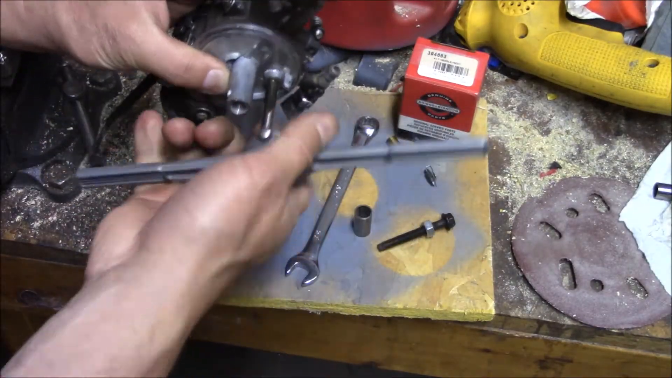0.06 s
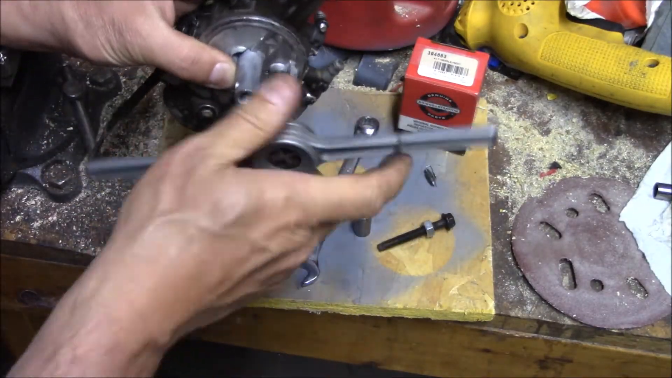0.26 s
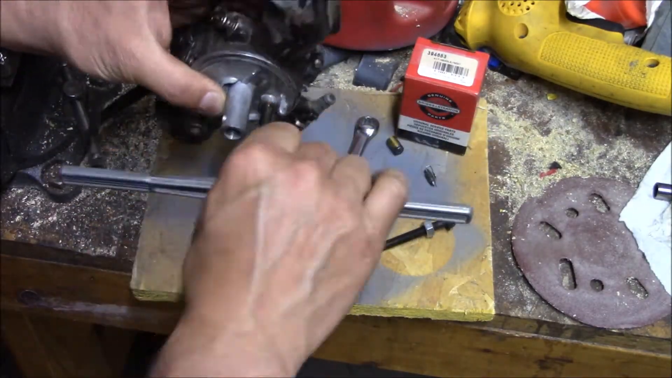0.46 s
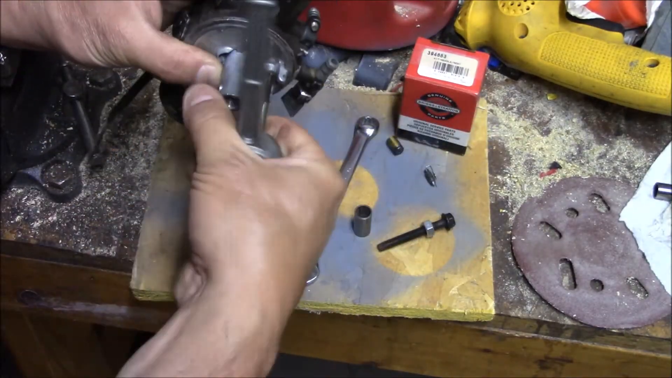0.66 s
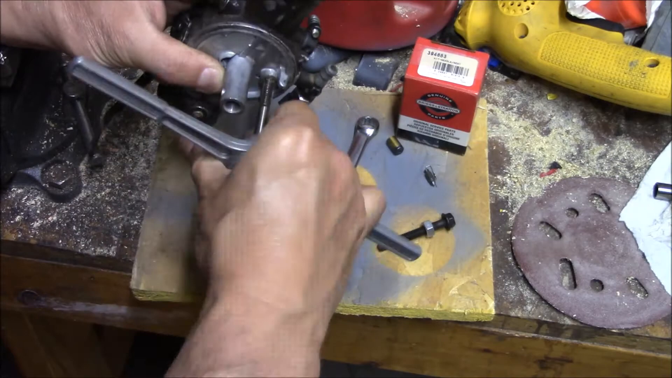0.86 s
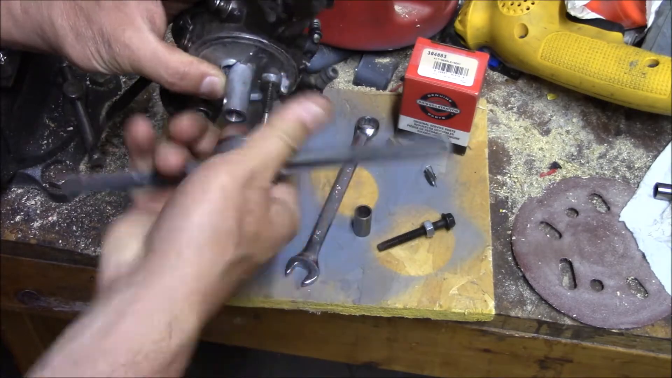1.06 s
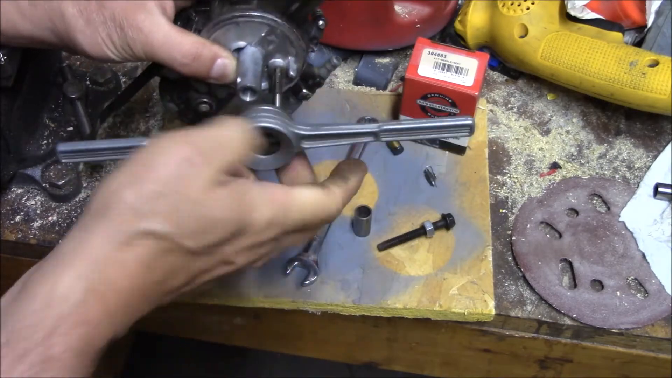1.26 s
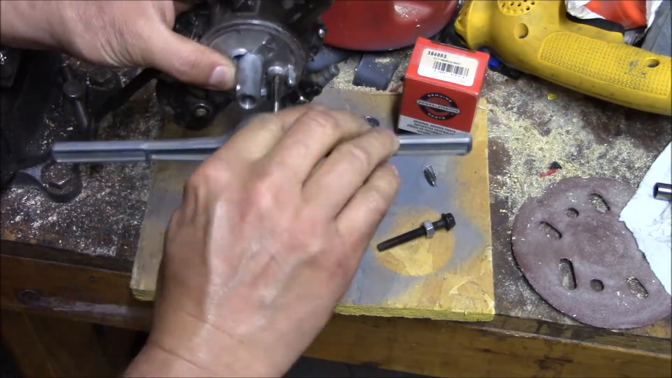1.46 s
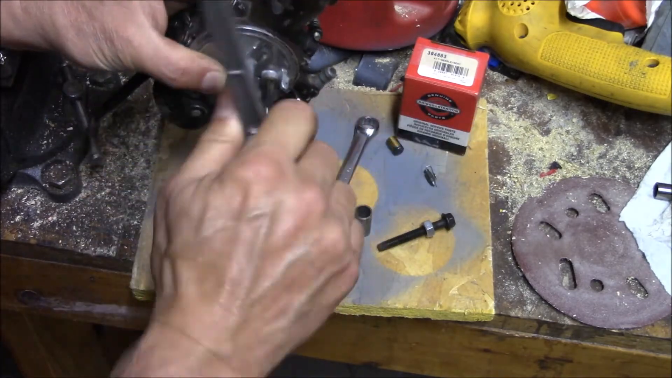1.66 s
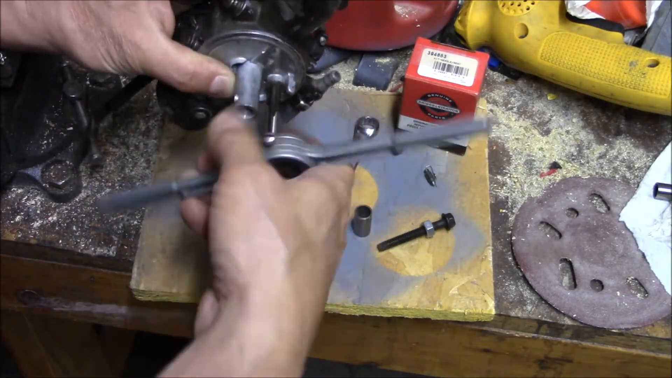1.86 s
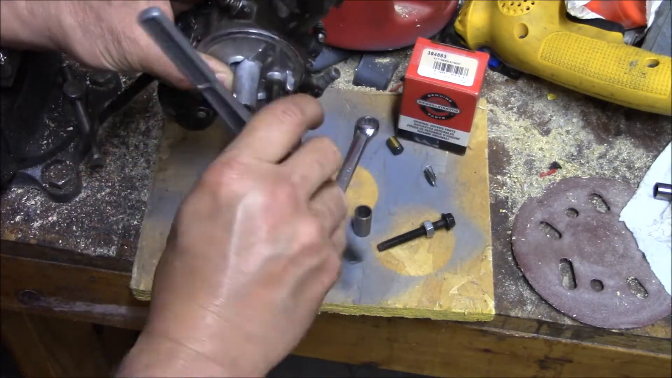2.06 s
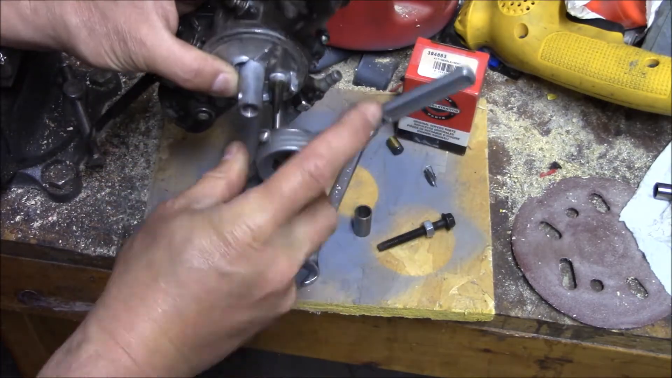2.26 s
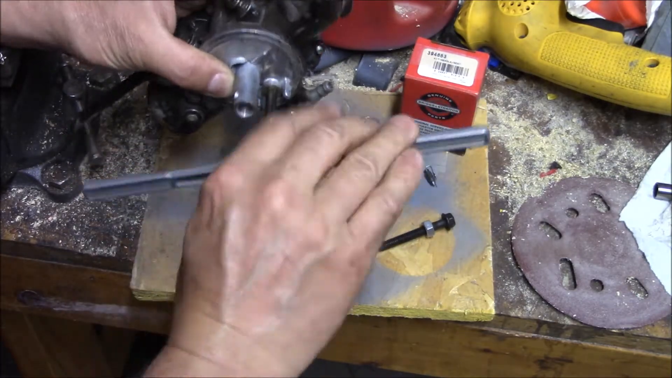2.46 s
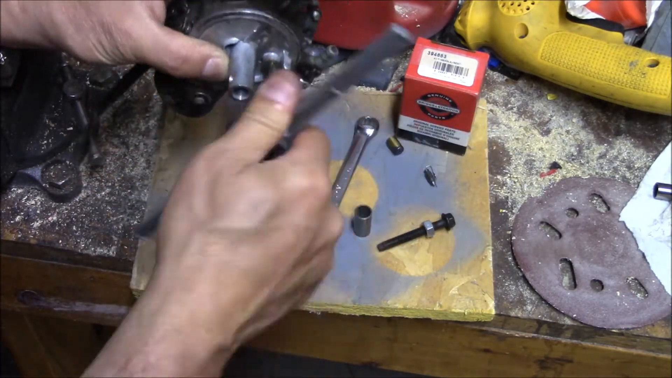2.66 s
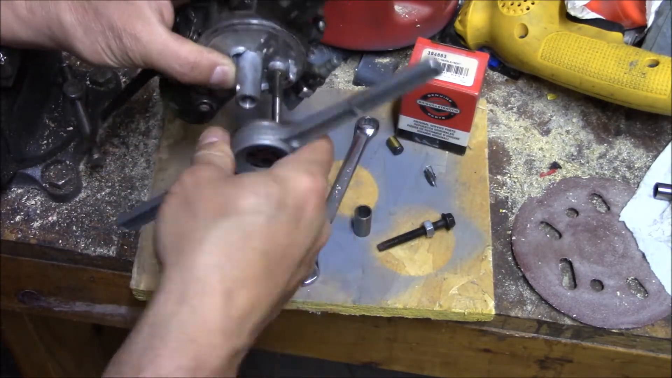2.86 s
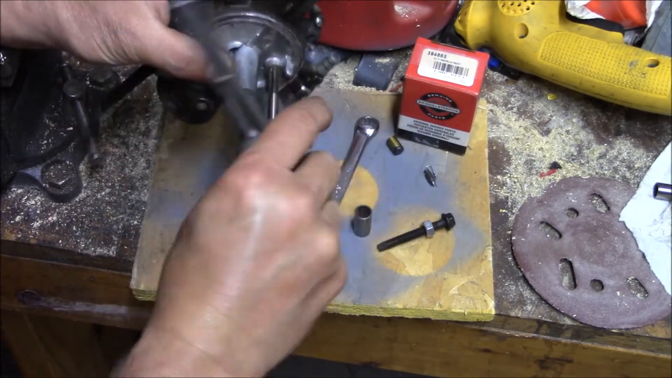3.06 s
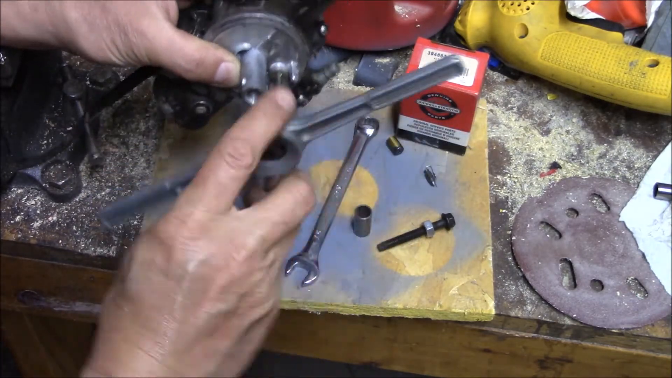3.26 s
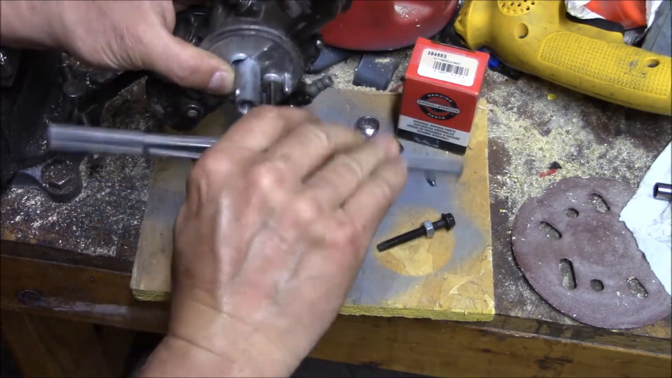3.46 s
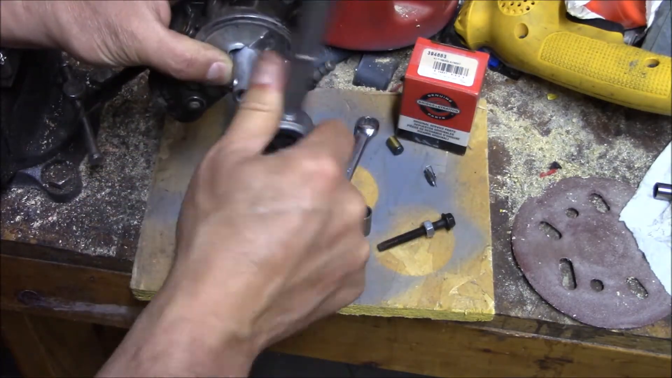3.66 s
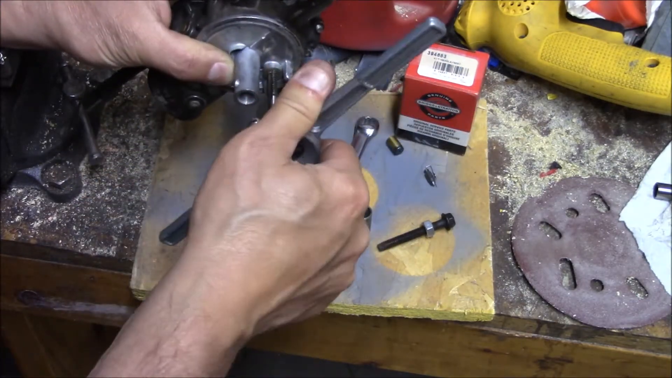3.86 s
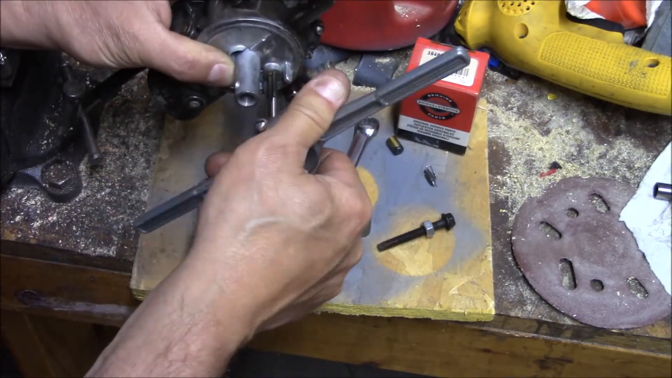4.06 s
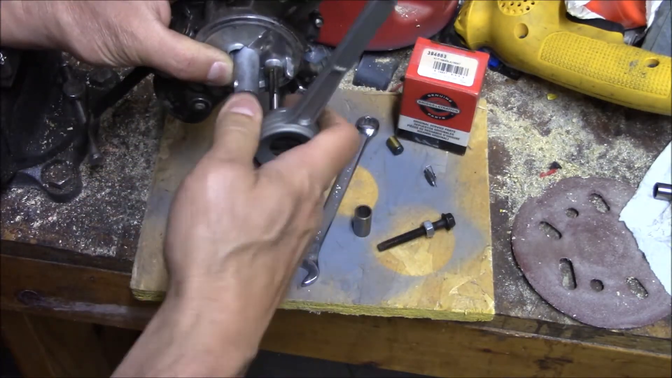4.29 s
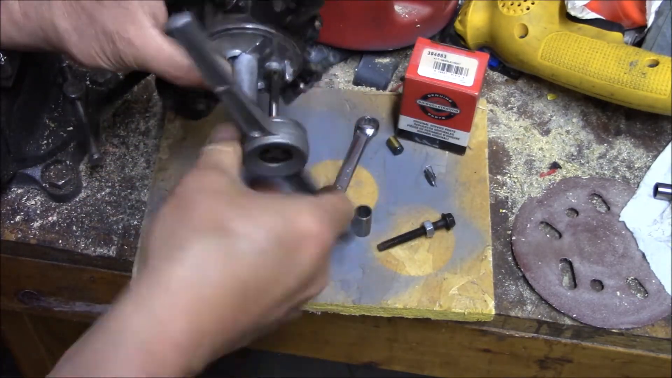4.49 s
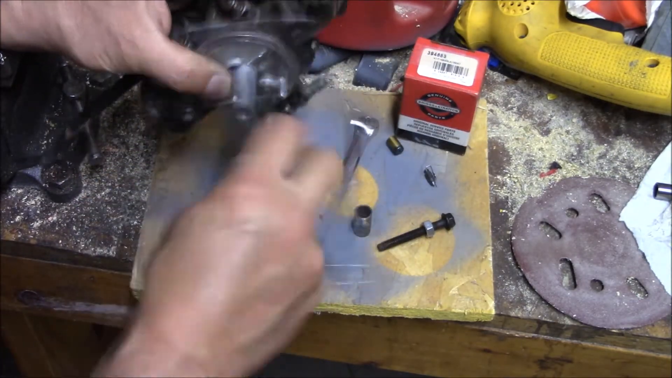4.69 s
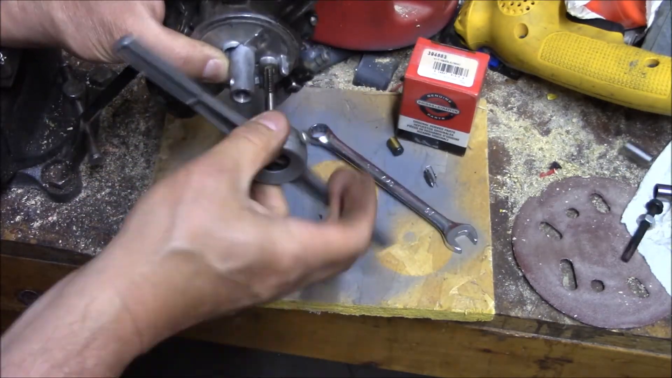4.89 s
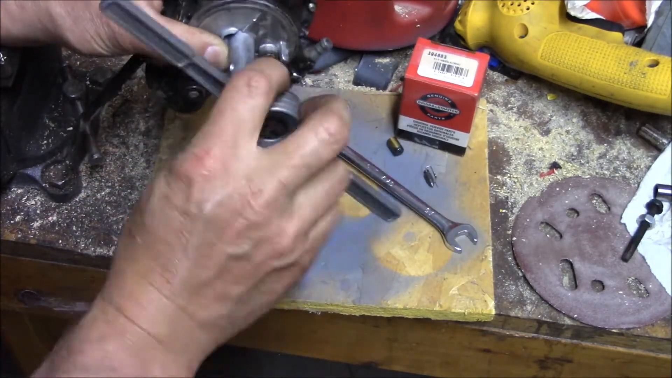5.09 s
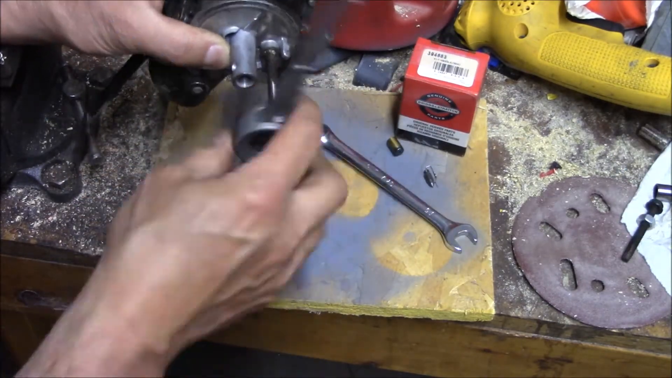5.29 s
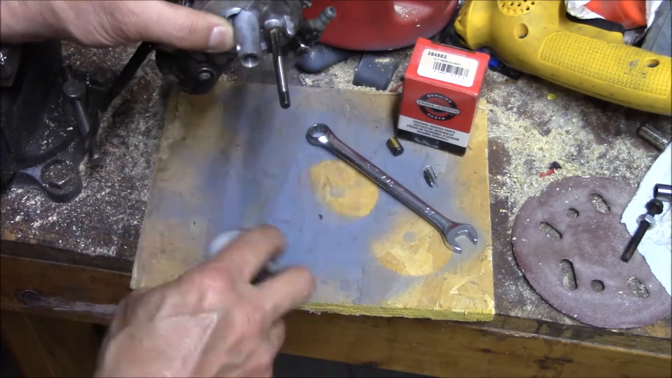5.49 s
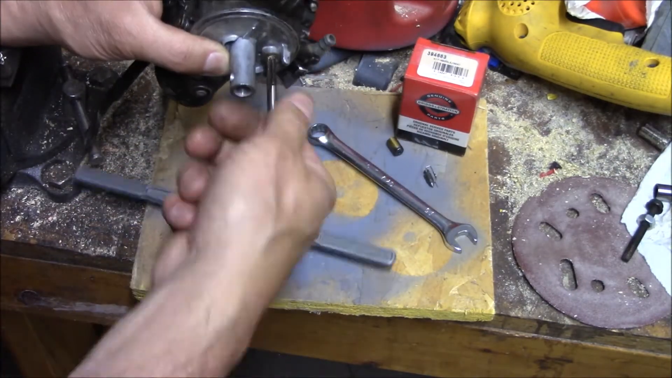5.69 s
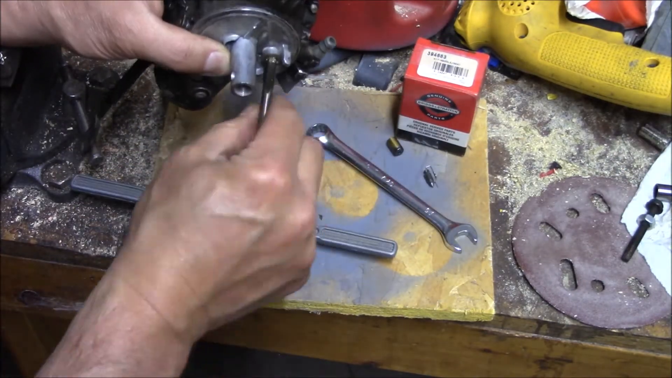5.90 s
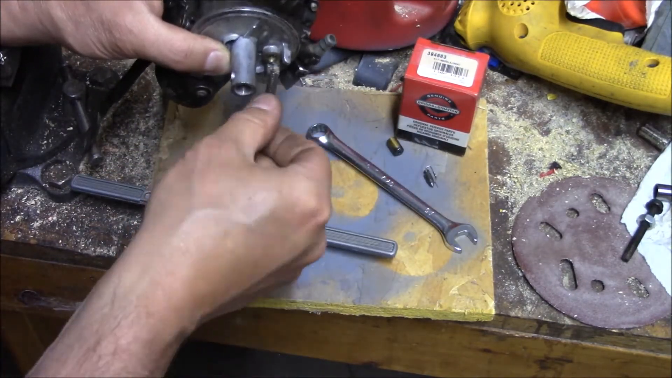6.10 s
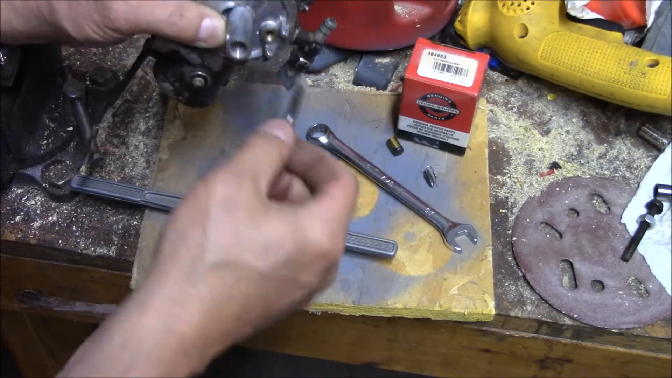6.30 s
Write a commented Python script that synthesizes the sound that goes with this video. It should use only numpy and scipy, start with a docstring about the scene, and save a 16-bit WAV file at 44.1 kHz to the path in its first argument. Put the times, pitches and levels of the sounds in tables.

```python
"""Soft bumps on the bench, then the wrench handle clicks in its play and skin rubs over it, as soft noise strokes.
Five pushes turn a tap in a small metal casting: random slips rasp through resonances, with sharp ticks.
Late on, an arm of the wrench hits a spanner on the board: noise cracks, a bouncing rattle, decaying modes.
The wrench is laid down with a clack and a thud, then soft bumps sound on the bench again.
A short workshop tail, a steady filtered hiss and faint wavering tones lie under it all."""
import sys
import numpy as np
from scipy import signal
from scipy.fft import rfft, irfft, next_fast_len
from scipy.io import wavfile

SR = 44100
rng = np.random.default_rng(int(sys.argv[2]) if len(sys.argv) > 2 else 0)


def materialize(psi):
    """Save the field psi as 16-bit PCM at rate SR to the path in sys.argv[1].

    A 1-D psi becomes a single channel; in a 2-D psi each row is a channel.
    """
    bounded = np.clip(np.atleast_2d(psi).T, -1, 1)
    quanta = np.round(bounded * 32767).astype(np.int16)
    wavfile.write(sys.argv[1], SR, quanta)


N = 279594  # length in samples

# All event levels are nominal: each source trims them before its filters.
# pushes that turn the tap: start_s, length_s, first_rasp_db, last_rasp_db, tick_over_rasp_db
PUSHES = [(0.54, 0.125, -56, -57, 5), (0.963, 0.096, -56, -57, 6), (1.473, 0.28, -56, -50.5, 8),
          (2.485, 0.2, -51, -52.5, 4), (3.555, 0.19, -56.5, -56, 13.5)]
# loud single ticks, in and between pushes: start_s, level_db
LOUD_TICKS = [(0.5634, -36), (0.598, -39), (0.626, -37), (0.6402, -40), (1.1925, -38), (1.198, -35),
              (1.6714, -30.5), (1.7296, -28), (2.0606, -35), (2.4867, -41), (2.6225, -35), (3.4829, -32.5),
              (3.5574, -34.5), (3.6381, -29.5), (3.677, -30), (3.7352, -39.5), (3.75, -36), (3.891, -34.5),
              (3.9016, -33.5), (4.437, -37), (4.684, -30), (5.3426, -33.5)]
# handle shifting on the tap's square: start_s, level_db, low_ring_db (relative to level)
HANDLE_CLICKS = [(0.2205, -37, -12), (0.3056, -45, -6.5), (0.367, -29, -13), (0.552, -44, -12),
                 (1.2048, -32.5, -17), (1.2952, -37.5, -11), (1.347, -44.5, -6), (2.0478, -42, -8.5),
                 (2.2096, -37, -23), (2.329, -34.5, -16), (2.831, -36, -16), (3.028, -36, -9),
                 (3.2957, -38, -15), (4.1308, -39, -17), (4.483, -33, -25), (4.509, -40, -12.5),
                 (4.5867, -36, -19), (4.857, -35.5, -3), (4.9375, -40, -12.5)]
# main blows of steel on steel: start_s, level_db, ring_db (relative to level)
BLOWS = [(4.6952, -3.5, -22), (4.7160, -12.5, -7.5), (4.7228, -11, -13), (4.7812, -35, -26),
         (4.7948, -36.5, -22)]
# wrench meeting the board: start_s, steel_level_db, board_level_db
LANDINGS = [(5.566, -18, -32), (5.5748, -24, -25), (5.5780, -44, -28.5), (5.596, -52, -39.5),
            (5.6530, -55, -48)]
# soft bumps of hand, wrench and casting: start_s, level_db, edge_db (relative to level), settling_s
SOFT_BUMPS = [(0.118, -35.5, -6, 0.013), (0.124, -34.5, -15, 0.033), (4.857, -50, -6, 0.032),
              (4.873, -40, -2, 0.02), (5.657, -49, 0.5, 0.018), (5.814, -45, -16, 0.02),
              (5.898, -39.5, -17, 0.13), (6.137, -37.5, -16, 0.023), (6.158, -31.5, -14, 0.017),
              (6.185, -33.5, -29, 0.025), (6.304, -32.5, -13, 0.07), (6.33, -34, -10, 0.03)]
# strokes of skin on the handle: middle_s, level_db, centre_hz
RUBS = [(0.29, -61.5, 1000), (0.547, -60, 880), (0.721, -63, 890), (1.331, -59.5, 1190), (1.628, -63, 1270),
        (1.96, -59.5, 1020), (2.244, -55, 1520), (2.619, -58, 1110), (2.825, -58.5, 1415), (3.21, -60, 980),
        (3.447, -64.5, 1613), (4.135, -65.5, 1233), (4.47, -62, 940), (5.691, -60, 1261)]

# resonances of the shank, the tap's lowest ringing, when rubbed: centre_hz, width_hz, level_db
SHANK_RESONANCES = [(5700, 260, -3.5), (6380, 110, 4.5), (7170, 280, -1)]
# resonances of the tap in its hole: centre_hz, width_hz, level_db
TAP_RESONANCES = [(5400, 200, -8), (6200, 55, 4), (7650, 410, -1), (10180, 600, 0), (11650, 200, 1),
                  (13250, 460, 4), (13750, 900, 7), (15700, 390, 3)]
# low ring of the handle: centre_hz, width_hz, level_db
HANDLE_RESONANCES = [(1380, 1700, -10), (2935, 450, 1), (4010, 390, -1)]
# bright snap of the handle on the square: centre_hz, width_hz, level_db
SOCKET_RESONANCES = [(6300, 2200, -5), (8630, 470, -2.5), (11740, 2700, -1), (11920, 1100, 3),
                     (14900, 1150, 0.5)]
# bench top and casting under a soft bump: centre_hz, width_hz, level_db
BENCH_RESONANCES = [(484, 164, -11), (740, 53, 1.5), (875, 72, 3.5), (1190, 230, -0.5), (1720, 360, -4),
                    (2180, 580, -8), (3300, 580, -20.5)]

# ringing modes of the spanner: pitch_hz, level_db, t60_s
SPANNER_MODES = [(1911, -1, .095), (2280, -7, .075), (3588, -5, .085), (4346, -10, .07), (4980, -5, .075),
                 (5089, -4, .075), (5904, -6, .07), (7925, 0, .06), (8215, -10, .07), (11097, -3, .07),
                 (11159, -3, .07), (12244, -9, .07), (12383, -8, .07), (14751, -9, .075)]
# ringing modes of the wrench bar: pitch_hz, level_db, t60_s
BAR_MODES = [(1701, -3, 0.096), (1980, -3, 0.11), (2140, -16, .15), (2286, 12.5, 0.024), (5330, -16, 0.14)]
# ringing modes of the board: pitch_hz, level_db, t60_s
BOARD_MODES = [(514, -8, 0.4), (557, -0.5, 0.29), (868, -6, 0.28), (978, -5, 0.38), (1148, 3, 0.18)]

# relative spectrum of the thread grit: frequency_hz, density_db
RASP_COLOUR = [(2940, -37), (5000, -14), (5350, 4), (5790, -26), (6160, 0.5), (6500, -3), (6660, -15),
               (7670, 2), (8970, -6), (11300, 4), (12300, -5), (15100, -18), (16000, -14.5)]
# relative spectrum of the steel blows: frequency_hz, density_db
CRACK_COLOUR = [(30, -28), (150, -38), (300, -28), (600, -15), (800, -20.5), (1400, -7), (2300, -3),
                (3150, -10.5), (4200, 1), (5000, 1.5), (5500, -7), (7600, -6), (9200, -10), (11000, -4),
                (13300, -11), (15500, -6)]
# relative spectrum of the wrench head's clack: frequency_hz, density_db
HEAD_COLOUR = [(100, -49), (1200, -13), (2300, -13), (3000, -1.5), (3800, -12), (4300, -7), (4780, 3.5),
               (5350, -3), (6300, -13.5), (7100, -18), (9200, -24), (11000, -17), (13000, -33),
               (15000, -24)]
# relative spectrum of the board's thud: frequency_hz, density_db
THUD_COLOUR = [(88, -65), (150, -34), (534, -5), (637, -4), (905, -3.5), (1450, -2.5), (1940, -5),
               (2450, -9), (9440, -17), (11300, -11), (16000, -40)]
# relative spectrum of the hard edge of a bump: frequency_hz, density_db
EDGE_COLOUR = [(1500, -16), (3500, 2), (6000, -5), (10000, -10.5), (16000, -29)]
# gain curve over the skin strokes: frequency_hz, gain_db
SKIN_COLOUR = [(150, -14), (400, -10), (800, 2), (1800, -1), (2600, -3), (12000, 9)]
# relative spectrum of the workshop hiss: frequency_hz, density_db
AIR_COLOUR = [(15, -70), (25, -23.5), (180, -20), (344, -13.5), (463, -8), (887, -3), (962, -2), (1290, -3),
              (1650, -3), (1790, -5), (4030, -8.5), (4740, -13), (5430, -9.5), (14800, -18.5), (16000, -19)]

# faint background tones: pitch_hz, level_db
HUM_TONES = [(234, -89), (959, -72.5), (1178, -73), (1416, -72), (1650, -70.5)]
# left-right likeness of the hiss: frequency_hz, correlation (plain number)
HISS_LIKENESS = [(60, 0.13), (150, 0.011), (380, 0.584), (950, 0.7), (2380, 0.49), (5980, 0.52),
                 (15000, 0.88)]
# decay of the workshop tail: frequency_hz, t60_s
ROOM_DECAY = [(200, 0.16), (700, 0.49), (2000, 0.14), (6000, 0.094), (15000, 0.1)]
# side share of the bench reflection: frequency_hz, gain_db
BENCH_SIDE = [(500, -30), (3000, -36), (8000, -20.5), (14000, -19)]

PUSH_ATTACK_S, PUSH_RELEASE_DB_PER_S = 0.0072, 300
DIP_S, DIP_DB = 0.0097, -7  # the push strength dips just before a loud tick
RUN_TICKS_PER_S, TICK_JITTER, TICK_SPREAD_DB = 92, 0.3, 3.5  # jitter in tick intervals
LOOSE_TICKS_PER_S, LOOSE_TICK_DB = 3.6, -43.5  # faint ticks, anywhere in time
CLICK_REBOUND_S, CLICK_REBOUND_DB = 0.011, -11.5  # the handle falls back once
LEAD_IN_S, LEAD_IN_DB = 0.0022, -29.5  # a faint noise burst just before the first blow
RATTLE_GAP_S, RATTLE_JITTER_S = 0.0075, 0.001026  # spacing of the spanner's bounces
RATTLE_DB, RATTLE_RING_DB, RATTLE_HOLD_S, RATTLE_FADE_DB_PER_S = -20, -6.5, 0.035, 420
RATTLE_MUTE_DB_PER_S = 250  # the board damps the ring as the spanner lies down
KNOCK_GAP_S, KNOCK_SETTLED_DB = 0.007, -23.5  # gap between contacts; loss over the settling time
RUB_HALF_S, RUB_WIDTH_HZ = 0.065, 550  # time to 1/e either side of a stroke; width of the hand's resonance
HISS_DB = -58.5
TOP_HZ = 15950  # half amplitude here


def threads():
    """Tiny slips rasp in the hole: light pressure sings in the shank, hard pressure adds bright grit."""
    slips_per_s, spread_db, slip_t60 = 480, 4, .004
    slip_sizes = amp(spread_db * np.minimum(rng.standard_normal(N), 1.5))
    slips = (rng.random(N) < slips_per_s / SR) * slip_sizes
    pressure = signal.lfilter([1], [1, -amp(-60 / (slip_t60 * SR))], slips)

    def grit():
        return unit(pressure * rng.standard_normal(N))

    push = effort(np.arange(N) / SR)
    firm = amp(-56.0)  # reference strength of a firm push
    # the singing grows more slowly than the push
    singing = resonated(grit() * firm * (push / firm) ** 0.67, SHANK_RESONANCES)
    rasp = coloured(grit() * push, RASP_COLOUR)
    tap_ring = resonated(grit() * push, TAP_RESONANCES)
    return amp(-8.5) * singing + amp(-8.5) * rasp + amp(-11.5) * tap_ring


def effort(t):
    """Push strength at times t: it takes hold quickly, stiffens or eases evenly, lets go, and dips before loud ticks."""
    total = np.zeros(len(t))
    for s, length, first_db, last_db, _ in PUSHES:
        held_db = np.interp(t, [s, s + length], [first_db, last_db])
        release_db = PUSH_RELEASE_DB_PER_S * np.maximum(t - s - length, 0)
        attack = np.clip((t - s) / PUSH_ATTACK_S, 0, 1)
        total += attack * amp(held_db - release_db)
    dipped = np.any([(t > s - DIP_S) & (t < s) for s, _ in LOUD_TICKS], axis=0)
    return total * amp(DIP_DB * dipped)


def ticks():
    """Sharp ticks, in uneven runs during pushes and singly between them: an impulse and chatter ring the tap."""
    track, chatter_trim_db, faintest_db = np.zeros(N), -6, -52
    late, strength = rng.standard_normal((int(RUN_TICKS_PER_S * N / SR), 2)).T
    times = np.abs(np.arange(len(late)) + TICK_JITTER * late) / RUN_TICKS_PER_S
    starts, *_, tick_db = np.transpose(PUSHES)
    push_db = 20 * np.log10(effort(times) + 1e-9)
    over_db = tick_db[np.searchsorted(starts, times) - 1]
    levels_db = push_db + over_db + TICK_SPREAD_DB * strength
    run = [(s, db) for s, db in zip(times, levels_db) if db > faintest_db]
    draws = rng.random((int(LOOSE_TICKS_PER_S * N / SR), 2))
    loose = [(u * N / SR, LOOSE_TICK_DB + TICK_SPREAD_DB * (2 * v - 1)) for u, v in draws]
    for s, db in LOUD_TICKS + run + loose:
        snap = contact(db + chatter_trim_db, t60=.006, chatter_db=-9, chatter_t60=.035)
        snap[0] += amp(db + 6.5)  # the sharp impulse
        add(track, s, resonated(snap, TAP_RESONANCES, scatter_db=3.5))
    return track


def handle():
    """The loose handle snaps against the tap's square and falls back, its resonances varied at each contact."""
    track = np.zeros(N)
    rebounds = [(s + CLICK_REBOUND_S, db + CLICK_REBOUND_DB, low_db) for s, db, low_db in HANDLE_CLICKS]
    for s, db, low_db in HANDLE_CLICKS + rebounds:
        snap = contact(db - 6.5, t60=0.0054, chatter_db=-5, chatter_t60=0.068)
        snap[0] += amp(db + 4)  # the sharp impulse
        add(track, s, resonated(snap, SOCKET_RESONANCES, scatter_db=4.0))
        low = contact(db + low_db + 1, t60=0.0094, chatter_db=-5.5, chatter_t60=0.077)
        add(track, s, resonated(low, HANDLE_RESONANCES, scatter_db=2.0))
    return track


def clash():
    """An arm of the handle strikes the spanner, which rattles and rings; the board rings once at the start."""
    s, levels_db, ring_db = np.transpose(BLOWS + rattle(count=14))
    blows = [contact(db - 5.5, t60=0.019, chatter_db=-9.5, chatter_t60=0.076) for db in levels_db]
    crack = contacts(s, blows)
    # the last, lightest bounces are the brightest: the colour crosses over to the socket's snap
    settle_s, fade_s = 4.738, .02
    light = np.clip((np.arange(N) / SR - settle_s) / fade_s, 0, 1)
    steel = coloured(crack * (1 - light), CRACK_COLOUR) + resonated(crack * light, SOCKET_RESONANCES)
    ringing = rings(s, levels_db + ring_db - 8, SPANNER_MODES, scatter_db=1.5)
    board_db = -45
    # the first blow also shakes the board
    return steel + ringing + rings(s[:1], [board_db], BOARD_MODES, scatter_db=3.5)


def rattle(count):
    """A faint lead-in, then spanner bounces, even while the arm drives it, then fading: start_s, level_db, ring_db."""
    first_s = BLOWS[0][0]
    after = RATTLE_GAP_S * np.arange(1, count + 1) + RATTLE_JITTER_S * rng.standard_normal(count)
    free = np.maximum(after - RATTLE_HOLD_S, 0)  # seconds since the arm stopped driving
    levels_db = RATTLE_DB - RATTLE_FADE_DB_PER_S * free
    ring_db = RATTLE_RING_DB - RATTLE_MUTE_DB_PER_S * free
    lead_in = (first_s - LEAD_IN_S, LEAD_IN_DB, RATTLE_RING_DB)
    return [lead_in] + list(zip(first_s + after, levels_db, ring_db))


def landings():
    """The wrench head clacks down, its bar rings briefly and the board under it thuds and rings."""
    s, steel_db, board_db = np.transpose(LANDINGS)
    steel = [contact(db - 5, t60=0.014, chatter_db=-6.5, chatter_t60=0.046) for db in steel_db]
    board = [contact(db - 8.0, t60=0.023, chatter_db=-7.5, chatter_t60=0.1) for db in board_db]
    clack = coloured(contacts(s, steel), HEAD_COLOUR)
    thud = coloured(contacts(s, board), THUD_COLOUR)
    # both rings follow the strength of the board's thud
    bar_ring = rings(s, board_db - 13.5, BAR_MODES, scatter_db=1.5)
    board_ring = rings(s, board_db - 27.5, BOARD_MODES, scatter_db=1.5)
    return clack + thud + bar_ring + board_ring


def knocks():
    """Hand, wrench and casting bump dully on the bench: a resonant body with a harder noise edge."""
    s, levels_db, edge_db = np.transpose(bumps(count=3))
    hits = [contact(db - 3, t60=0.0094, chatter_db=-8.5, chatter_t60=0.095) for db in levels_db]
    body = contacts(s, [resonated(hit, BENCH_RESONANCES, scatter_db=1.5) for hit in hits])
    hard = [contact(db - 4.5, t60=0.015, chatter_db=-3, chatter_t60=0.074) for db in levels_db + edge_db]
    edge = coloured(contacts(s, hard), EDGE_COLOUR)
    low_cut_hz = 330  # the small board radiates little bass
    low_cut = signal.butter(3, low_cut_hz, "highpass", fs=SR, output="sos")
    return signal.sosfilt(low_cut, body + edge)


def bumps(count):
    """Every bump is a few quick contacts that weaken as it settles: start_s, level_db, edge_db."""
    rows = []
    for s, db, edge_db, settle_s in SOFT_BUMPS:
        for t in KNOCK_GAP_S * np.arange(count):
            rows.append((s + t, db + KNOCK_SETTLED_DB * t / settle_s, edge_db))
    return rows


def hand():
    """Skin slides over the handle in swelling noise strokes; the cupped hand's resonance colours each."""
    track = np.zeros(N)
    t = np.arange(-2 * RUB_HALF_S, 2 * RUB_HALF_S, 1 / SR)
    for s, db, hz in RUBS:
        stroke = resonated(rng.standard_normal(len(t)), [(hz, RUB_WIDTH_HZ, 0)])
        swell = np.exp(-(t / RUB_HALF_S) ** 2)
        add(track, max(s + t[0], 0), amp(db) * swell * stroke)
    return filtered(track, lambda hz: amp(along(SKIN_COLOUR, hz)))


def workshop(x, side_db):
    """The room's short tail: noise decaying per band, nearly alike at the two close microphones."""
    hz, t, z = signal.stft(rng.standard_normal((2, SR // 2)), SR, nperseg=256)
    decay = amp(-60 * t / along(ROOM_DECAY, hz)[:, None])
    tail = signal.istft(z * decay, SR, nperseg=256)[1]
    mid, side = signal.fftconvolve(x[None], tail / np.linalg.norm(tail[0]), axes=1)[:, :N]
    return np.array([mid + amp(side_db) * side, mid - amp(side_db) * side])


def background():
    """Steady workshop hiss, its stereo width set per frequency, with faint tones whose phase wanders."""
    def spread(hz):
        # mid/side angle that gives the wanted left-right likeness
        angle = np.arccos(np.clip(along(HISS_LIKENESS, hz), -1, 1)) / 2
        return np.array([np.cos(angle), np.sin(angle)])

    noise = coloured(rng.standard_normal((2, N)), AIR_COLOUR)
    mid, side = filtered(noise, spread)
    hiss = amp(HISS_DB) * unit(np.array([mid + side, mid - side]))
    t, drift = np.arange(N) / SR, .02  # drift in radians per sample step
    hum = np.zeros(N)
    for hz, db in HUM_TONES:
        wander = drift * np.cumsum(rng.standard_normal(N))
        hum += amp(db) * np.sin(2 * np.pi * hz * t + wander)
    return hiss + hum


def contact(db, t60, chatter_db, chatter_t60):
    """A brief noise crack followed by weaker, longer chatter, with its energy held to that of the envelope."""
    t = np.arange(SR // 5) / SR
    shape = np.hypot(amp(-60 * t / t60), amp(chatter_db - 60 * t / chatter_t60))
    burst = shape * rng.standard_normal(len(t))
    return amp(db) * burst * np.linalg.norm(shape) / np.linalg.norm(burst)


def rings(times, levels_db, modes, scatter_db):
    """Each blow excites the modes at new strengths and phases; they swell within their first cycles."""
    t = np.arange(SR // 2) / SR
    hz, mode_db, t60 = np.transpose(modes)[:, :, None]
    fading = amp(mode_db - 60 * t / t60) * (1 - np.exp(-hz * t)) * np.exp(2j * np.pi * hz * t)

    def strength(db):
        phases = np.exp(2j * np.pi * rng.random(len(modes)))
        return amp(db + scatter_db * rng.standard_normal(len(modes))) * phases

    return contacts(times, [(strength(db) @ fading).imag for db in levels_db])


def contacts(times, sounds):
    """A track with each sound placed at its time."""
    track = np.zeros(N)
    for s, sound in zip(times, sounds):
        add(track, s, sound)
    return track


def add(track, s, sound):
    """Mix a sound in at time s, cut at the end of the track."""
    part = track[round(s * SR):][:len(sound)]
    part += sound[:len(part)]


def resonated(x, peaks, scatter_db=0):
    """Causal filter of unit power made of resonances; scatter varies their strengths with the point of contact."""
    signs = (-1) ** np.arange(len(peaks))
    gains = amp(scatter_db * rng.standard_normal(len(peaks))) * signs

    def response(f):
        total = 0
        for gain, (centre, width, db) in zip(gains, peaks):
            bandpass = 1j * f * width / (centre * centre - f * f + 1j * f * width)
            total = total + gain * amp(db) * bandpass
        return unit(total)

    return filtered(x, response)


def coloured(x, spectrum):
    """Causal filter of unit power with the given spectrum."""
    def response(hz):
        # folding the cepstrum forward in time gives minimum phase
        cepstrum = irfft(np.log(unit(amp(along(spectrum, hz))) + 1e-6))
        half = len(cepstrum) // 2
        cepstrum[1:half] *= 2
        cepstrum[half + 1:] = 0
        return np.exp(rfft(cepstrum))
    return filtered(x, response)


def filtered(x, response):
    """x times a complex response of frequency, zero-padded to an even length."""
    length = x.shape[-1]
    size = 2 * next_fast_len(length // 2 + 4096)
    return irfft(rfft(x, size) * response(np.fft.rfftfreq(size, 1 / SR)), size)[..., :length]


def along(points, hz):
    """(frequency, value) points read on a log frequency axis."""
    f, v = np.transpose(points)
    return np.interp(np.log(hz + 1), np.log(f + 1), v)


def unit(x):
    """Scaled to rms 1."""
    return x / np.sqrt(np.mean(np.abs(x) ** 2) + 1e-20)


def amp(db):
    """Decibels to gain."""
    return 10 ** (np.asarray(db) / 20)


def scene():
    """All the work happens close and almost straight ahead, with the room and the hiss around it."""
    work = threads() + ticks() + handle() + clash() + landings() + knocks() + hand()
    # a reflection off the bench reaches the two microphone ports with opposite sign
    bounce_s, balance_db = .0007, .2
    side = filtered(work, lambda hz: amp(along(BENCH_SIDE, hz)) * np.exp(-2j * np.pi * hz * bounce_s))
    direct = np.array([work + side, work - side])
    room = amp(-12.5) * workshop(work, side_db=-36.0)
    pair = direct + room + background()
    return pair * amp([[balance_db], [-balance_db]])


def record(dry):
    """A very steep low-pass leaves almost nothing above the band limit."""
    return filtered(dry, lambda hz: 1 / (1 + (hz / TOP_HZ) ** 160))


dry = scene()
out = record(dry)
materialize(out)
```